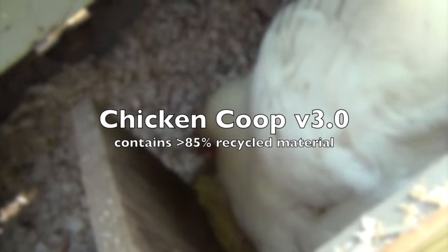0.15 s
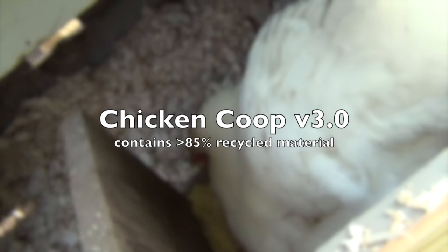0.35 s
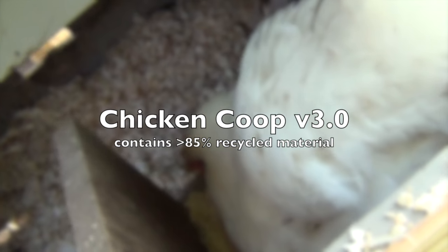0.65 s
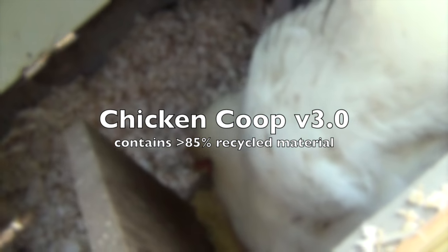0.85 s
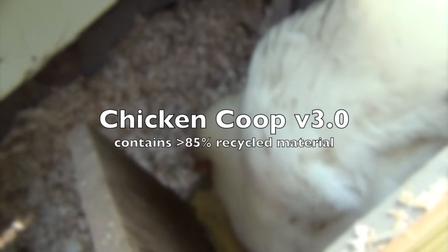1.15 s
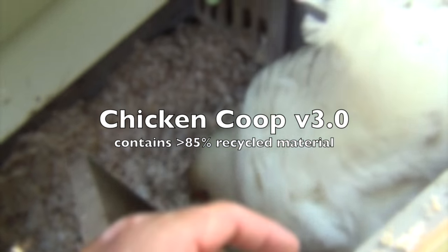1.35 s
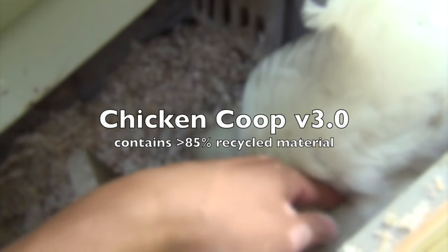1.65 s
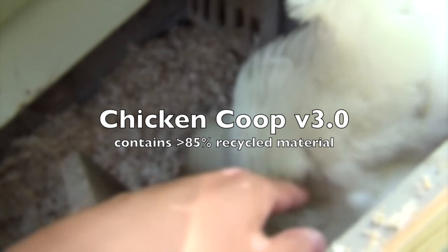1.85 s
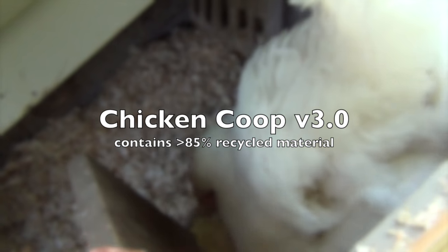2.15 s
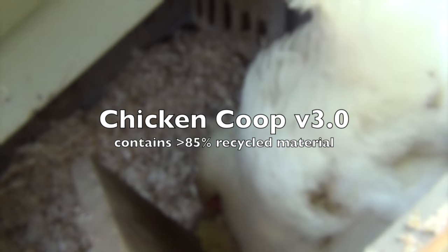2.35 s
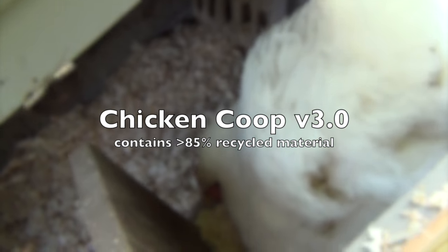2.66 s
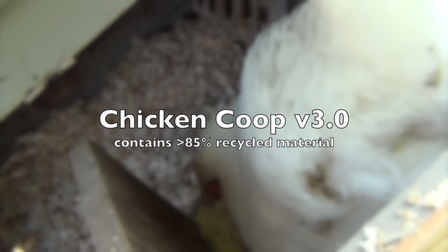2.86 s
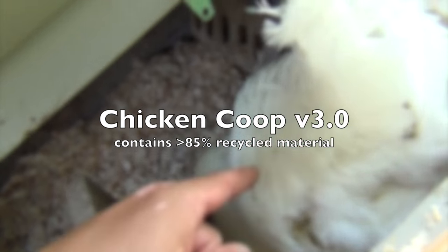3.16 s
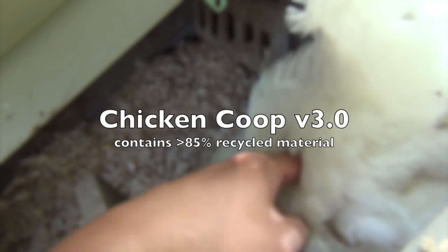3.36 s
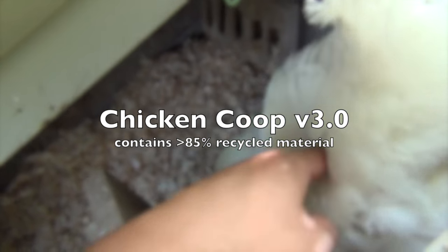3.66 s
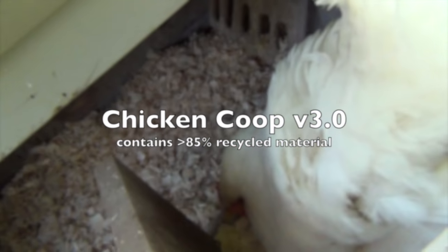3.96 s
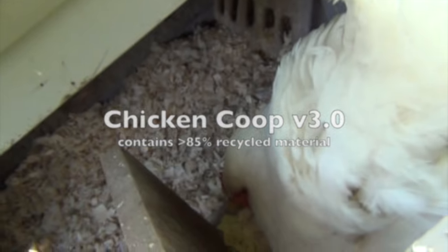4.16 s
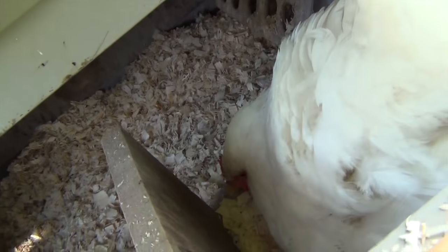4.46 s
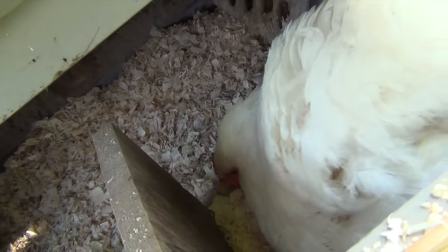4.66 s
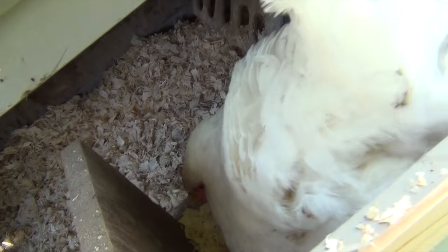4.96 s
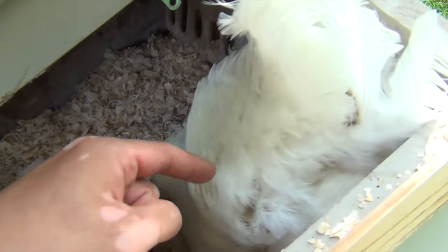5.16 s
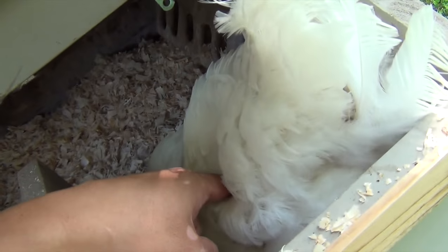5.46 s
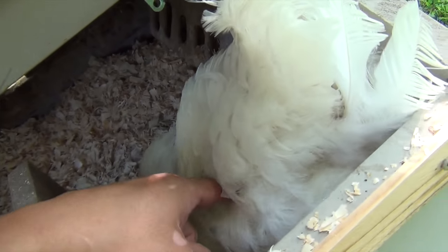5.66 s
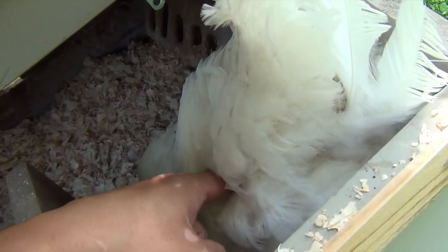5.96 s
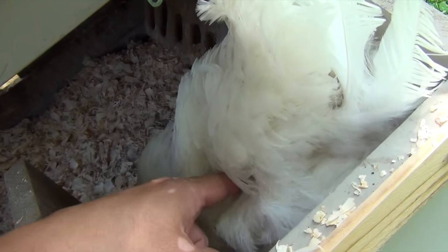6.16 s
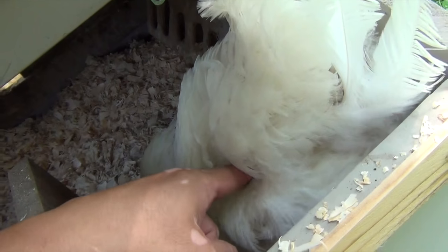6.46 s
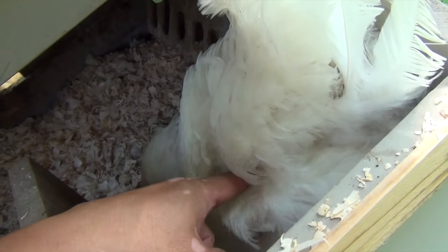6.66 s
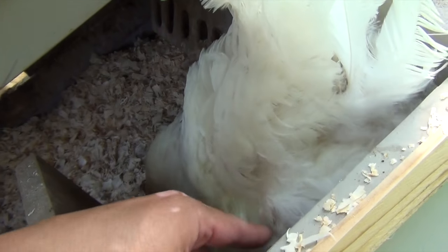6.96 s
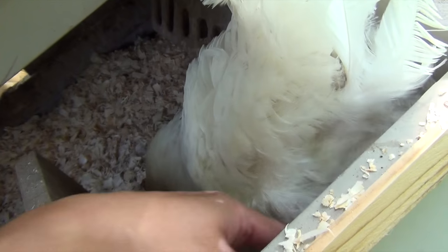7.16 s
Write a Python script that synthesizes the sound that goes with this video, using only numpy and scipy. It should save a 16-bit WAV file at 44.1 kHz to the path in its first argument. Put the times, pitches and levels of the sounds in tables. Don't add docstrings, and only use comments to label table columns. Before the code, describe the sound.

A hen clucks steadily up close in a wooden nest box, breaking into three harsh throbbing squawks amid board knocks and faint birdsong.

```python
import sys
import numpy as np
from scipy import signal
from scipy.io import wavfile
from scipy.ndimage import uniform_filter1d, minimum_filter1d

SR = 44100
rng = np.random.default_rng(int(sys.argv[2]) if len(sys.argv) > 2 else 0)


def store_pcm(level_fs):
    pcm = np.round(np.clip(level_fs, -1, 1) * 32767).astype(np.int16)
    wavfile.write(sys.argv[1], SR, np.atleast_2d(pcm).T)


def level_to_linear(level):
    exponent = np.asarray(level, float) / 20
    return 10 ** exponent


N = 321841

# [pitch_hz, density_db_per_hz]
YARD_COLOUR = [(18, -56), (42, -21.5), (62, -9), (199, 1.5), (389, -7), (620, -5), (725, -7.5),
               (1280, -6.5), (2320, -14.5), (5180, -17), (5900, -18.5), (12800, -26), (15000, -26)]
# [pitch_hz, likeness_0_to_1]
STEREO_LIKENESS = [(50, 0.86), (300, 0.63), (1000, 0.63), (3000, 0.11), (8000, 0.18), (13000, 0.2),
                   (15500, .9)]
# [pitch_hz, level_db]
WHINE_TONES = [(60, -81.5), (129, -77.5), (15674, -79.5), (15734.3, -71.5)]

# [start_s, length_s, first_hz, last_hz, level_db]
WARBLE_NOTES = [(0, .015, 1970, 1970, -47), (0.075, 0.038, 2200, 1850, -48), (2.545, 0.11, 2380, 2290, -63),
                (2.597, 0.12, 2450, 2550, -63.5), (2.77, 0.11, 2800, 2750, -65.5),
                (2.622, 0.056, 2550, 2708, -64), (2.65, 0.073, 2610, 2210, -64),
                (2.719, 0.053, 2801, 2520, -56.5), (2.748, 0.044, 2770, 2619, -59),
                (2.817, .055, 2730, 2400, -61.5), (2.953, 0.061, 3360, 3300, -61.5),
                (2.973, 0.077, 2814, 2790, -59), (3.012, 0.042, 2900, 2810, -57),
                (4.417, 0.025, 1920, 2240, -47.5), (4.472, .07, 3000, 3420, -64),
                (4.633, 0.074, 4500, 4380, -59), (4.74, 0.086, 4330, 4520, -62),
                (4.757, 0.039, 3080, 3000, -54.5), (4.825, 0.0251, 1840, 2300, -52.5),
                (4.867, 0.057, 3370, 3150, -56.5), (5.328, 0.035, 3180, 2890, -58),
                (6.418, 0.049, 1940, 1627, -55.5)]
# [start_s, length_s, first_hz, last_hz, level_db]
SEEP_NOTES = [(1.222, .044, 4190, 3690, -74.5), (1.381, 0.064, 4260, 3690, -64),
              (1.337, 0.11, 7560, 7350, -55.5), (1.399, 0.043, 5930, 5500, -62.5),
              (1.605, .032, 4170, 3656, -62.5), (1.55, .074, 6580, 6600, -76.5),
              (5.028, .086, 7694, 7530, -61), (5.077, .06, 7680, 6740, -67), (7.238, 0.02, 8000, 8100, -61),
              (7.247, 0.031, 9100, 8700, -65), (7.25, .018, 5800, 4680, -66)]
# [time_s, pitch_hz, level_db]
WHISTLE_PATH = [
    (4.97, 3700, -45),
    (5.061, 3410, -69),
    (5.2, 3550, -72),
    (5.3, 3800, -63.5),
    (5.42, 4130, -77.5),
    (5.55, 3900, -66),
    (5.65, 3840, -68),
]
# [time_s, base_hz, flick_hz, level_db]
TRILL_PATHS = [
    [(6.285, 2170, 20.6, -59), (6.312, 2250, 776.8, -44.5), (6.322, 2420, 5.1, -51.5),
     (6.335, 2260, 3, -40.5), (6.345, 2100, 4.4, -65)],
    [(6.465, 2405, 201.5, -34), (6.475, 2410, 692, -40.5), (6.507, 2516, 1046, -41),
     (6.53, 2336, 700, -37.5), (6.55, 2040, 300, -50.5), (6.568, 1947, 198, -48.5)],
]
# [flick_s, flicks_per_s]
TRILL_FLICKS = [
    (6.311, 45),
    (6.507, 54),
]

# [start_s, level_db, rise_ms, tilt_db_per_octave, ring_factor]
BOARD_BLOWS = [(0.016, -30.5, 4.6, 4.5, 0.68), (0.0242, -22.5, 2.57, 2, 0.35),
               (0.7288, -43.5, 2.2, -2, 0.37), (0.749, -38.5, 1.1, 0.5, 0.44),
               (0.7556, -25.5, 0.99, 2, 0.31), (1.9169, -21, 0.77, 4, 0.18), (1.95, -40, 1.1, 4, 0.41),
               (2.3369, -36.5, 1.1, 5, 0.45), (2.343, -26, 2.8, 3.5, 0.43), (3.337, -36.5, 6.2, 4, 1.2),
               (3.3456, -24, 12, 3, 0.45), (4.6117, -24, 0.97, 3, 0.37), (4.925, -27, 17, 3.5, 0.69)]
# [pitch_hz, density_db_per_hz]
SHARP_COLOUR = [(47, -44.5), (80, -28), (405, -0.5), (610, 4.5), (881, -12), (1300, -9), (1450, 5),
                (1610, -17.5), (2140, -8), (3830, -17), (14000, -62.5)]
# [pitch_hz, density_db_per_hz]
SLOW_RISE_COLOUR = [(47, -56.5), (80, -33.5), (413, 4.5), (993, -5), (1110, -9.5), (1440, -6.5), (2000, -21),
                    (2440, -16), (8120, -33.5), (15000, -73.5)]
# [pitch_hz, width_hz, level_db above the colour]
BOARD_PEAKS = [(1320, 26, 0), (1800, 31, -1), (2430, 42, 7), (3653, 82, 5.5)]
# [pitch_hz, t60_s]
BOARD_DECAY = [(200, 0.9), (700, 0.46), (2000, 0.42), (5000, 0.24), (10000, 0.11)]
# [start_s, level_db, pitch_hz, width_hz]
TICK_SNAPS = [(3.1333, -25.5, 5200, 2320), (3.1328, -34.5, 9500, 2310), (4.011, -42, 4600, 1195),
              (5.7, -57.5, 7200, 1976), (6.123, -45.5, 7200, 2795), (6.891, -57, 7500, 2570),
              (7.123, -53, 7400, 3000), (1.578, -49.5, 4500, 1500), (0.024, -27, 2200, 2500),
              (0.756, -6, 2700, 2200), (1.9174, -15, 3000, 2400), (4.6141, -36, 2800, 2400)]

# [pitch_hz, t60_s]
NEST_DECAY = [(150, 0.25), (700, 0.038), (1500, 0.11), (4000, .08), (9000, 0.025)]
# [pitch_hz, t60_s]
COOP_DECAY = [(200, .22), (600, 0.29), (1500, 0.33), (2500, 0.16), (6000, 0.18)]
# [throat_factor, width_hz, level_db]
WINDPIPE = [(.7, 280, 13.5), (1.01, 350, 17.5), (1.4, 320, 0)]
# [pitch_hz, width_hz, level_db]
SQUAWK_UPPER = [(1475, 540, 3), (2040, 320, 1.5)]
# [pitch_hz, width_hz, level_db]
CLUCK_UPPER_THROAT = [(1500, 370, -7.5), (2046, 330, 2)]
# [pitch_hz, width_hz, level_db beside the upper throat]
PALATE_BAND = [(2950, 700, -24)]
# [pitch_hz, width_hz, level_db beside the effort]
BEAK_AIR = [(7400, 4200, -65.5)]
# [pitch_hz, width_hz, level_db]
BEAK_RASPS = [(4150, 820, 9), (5250, 500, -7.5)]

# [start_s, first_db, second_ms, second_db, end_ms]
CLUCK_PUFFS = [(.127, -21.5, 21.5, -16.5, 34.4), (0.519, -17.5, 16.7, -16.5, 32.2),
               (.919, -17.5, 16.6, -14.5, 24.8), (1.298, -15, 13.6, -19.5, 27),
               (1.628, -17.5, 17.4, -10.5, 38.5), (2.313, -20, 17.6, -14.5, 24.765),
               (2.718, -16.5, 14, -16, 23.1), (3.132, -12.5, 16, -17.5, 28.6),
               (3.429, -12.5, 11.5, -16.5, 37), (4.103, -20, 15.3, -14, 33),
               (4.579, -14.5, 13.6, -18.5, 28.2), (5.009, -17.5, 10.3, -17, 24.4),
               (5.267, -11, 11.8, -17, 24), (5.553, -24, 33, -38, 4), (6.195, -14, 16.3, -11.5, 30.7),
               (6.567, -12.5, 14.3, -13, 23.6), (6.963, -10, 16, -10.5, 26), (7.282, -15, 1.6, -11.5, 35)]
# [first_hz, second_hz, throat_hz, chest_db, upper_db]
CLUCK_TONES = [(443, 270, 795, 8, -30.5), (471, 330, 750, 9.5, -43.5), (406.5, 250, 680, 9, -41),
               (420, 300, 730, 9.5, -54), (412, 380, 750, 2.5, -27.5), (439, 260, 830, 10.5, -33.5),
               (421, 260, 795, 11.5, -39), (407.6, 292, 773, 6.5, -35), (401, 360, 785, 3, -29),
               (444.5, 230, 817, 9.5, -26), (423, 330, 723, 10.5, -32.5), (430, 390, 756, 8.5, -28),
               (396, 320, 750, 9, -30), (200, 200, 730, 7, -34.5), (373.4, 240, 833, 8, -29.5),
               (383, 310, 840, 10.5, -29), (360, 394, 770, 9, -28), (396, 340, 790, 7, -27.5)]
CLUCK_RASP_LEVELS = [-52.5, -61, -60, -48.5, -38, -53, -63.5, -37, -37.5, -53, -48, -56.5, -35, -59, -34.5,
                     -42, -40.5, -33.5]

# [time_s, effort_db, pitch_hz]
SQUAWK_PATHS = [
    [(1.715, -29, 503.6), (1.757, -22.5, 524.8), (1.879, -15, 499.3), (1.96, -14.5, 416.7),
     (2.03, -12.5, 352.6), (2.082, -23, 279)],
    [(3.497, -29, 448.7), (3.511, -19.5, 463.9), (3.547, -23, 552.6), (3.657, -13, 519), (3.79, -12.5, 360),
     (3.838, -17, 313)],
    [(5.573, -21, 464.4), (5.589, -20.5, 464.5), (5.635, -21.5, 502), (5.745, -14, 496),
     (5.9, -13.5, 370.8), (5.945, -20, 270.3)],
]
# [time_s, level_db beside the effort, throat_hz]
SQUAWK_THROBS = [
    [(1.73, -0.3, 909), (1.7452, -0.4, 824), (1.7624, -3, 925), (1.777, 1.7, 802), (1.7928, -0.6, 861),
     (1.8119, 3.5, 850), (1.8229, -0.2, 816), (1.8421, -1.7, 817), (1.856, 5.5, 747)],
    [(3.5043, -3.5, 813), (3.5149, 2.5, 716), (3.5291, 1, 757), (3.5447, 0.3, 900), (3.5602, 1.2, 775),
     (3.5773, -0.5, 711), (3.5936, -2, 777), (3.605, 0.2, 909), (3.6265, 0.3, 797)],
    [(5.5781, -0.5, 788), (5.5932, 7.7, 723), (5.6082, 0, 907), (5.625, 2.7, 839), (5.64, 0, 834),
     (5.6553, -1, 829), (5.6719, -3, 871), (5.685, -1.5, 911), (5.7019, 2, 705), (5.721, 2.8, 859)],
]
# [depth_0_to_1, steady_s, loose_chest_db, pitch_fall_share, lean_to_sudden_end]
SQUAWK_FLUTTERS = [
    (.78, 1.85, -26, .1, .2),
    (.68, 3.62, -11, .17, .3),
    (.62, 5.7, -24, -.06, .6),
]
# [upper_db, low_rasp_db, high_rasp_db]
BEAK_START = [
    (-29, -52, -69.5),
    (-33, -76, -53),
    (-38, -75.5, -66),
]
# [upper_db, low_rasp_db, high_rasp_db]
BEAK_END = [
    (-19.5, -38.5, -67),
    (-19.5, -38, -33.5),
    (-23, -50.5, -36),
]


def evened(x):
    return x / np.sqrt(np.mean(x ** 2) + 1e-20)


def read(points, hz):
    f, value = np.transpose(points)
    return np.interp(np.log(hz + 1), np.log(f + 1), value)


def add(mix, start_s, sound):
    part = mix[..., round(start_s * SR):][..., :sound.shape[-1]]
    part += sound[..., :part.shape[-1]]


def drift(count, hz):
    noise = rng.standard_normal(count + 2000)
    return evened(signal.lfilter(*signal.butter(2, hz, fs=SR), noise)[2000:])


def edge(x, hz, kind, order):
    return signal.sosfilt(signal.butter(order, hz, kind, fs=SR, output="sos"), x)


def resonate(x, hz, width):
    turn = np.exp(2j * np.pi * np.cumsum(hz) / SR)
    r = np.exp(-np.pi * width / SR)
    return 2 * (turn * signal.lfilter([(1 - r) ** 2], [1, -2 * r, r ** 2], x / turn)).real


def cavity(modes):
    f = abs(np.fft.fftfreq(4096, 1 / SR))
    peaks = sum(level_to_linear(db) / (1 + ((f - hz) / width * 2) ** 4) for hz, width, db in modes)
    gain = np.log(peaks + 1e-5)
    return np.fft.ifft(np.exp(gain - 1j * signal.hilbert(gain).imag)).real[:2048]


def dying_noise(decay, gain=lambda hz: 1, stretch=1):
    hz = np.fft.rfftfreq(256, 1 / SR)
    t = np.arange(400) * 64 / SR
    a, b = rng.standard_normal((2, 2, 129, 400))
    fade = level_to_linear(-60 * t / (stretch * read(decay, hz))[:, None])
    z = (a + 1j * b) * fade * np.reshape(gain(hz), (-1, 1))
    return signal.istft(z, nperseg=256, noverlap=192)[1]


def yard():
    frames, hz = N // 256 + 5, np.fft.rfftfreq(1024, 1 / SR)
    a, b, c, d, patches = rng.standard_normal((frames, 513, 5)).T
    patches = uniform_filter1d(patches, size=12, axis=0)
    patches = evened(uniform_filter1d(patches, size=14, axis=1))
    same = np.clip(read(STEREO_LIKENESS, hz), -1, 1)[:, None]
    left = a + 1j * b
    right = same * left + np.sqrt(1 - same ** 2) * (c + 1j * d)
    z = np.array([left, right]) * level_to_linear(1.2 * patches)
    from_whine = abs(hz - 15520)
    skirt = level_to_linear(-24.5) * (from_whine < 260)
    z *= (level_to_linear(read(YARD_COLOUR, hz)) + skirt)[:, None]
    below_top = hz[:, None] < 14100 + 350 * patches[200]
    z *= np.where(below_top | (from_whine < 290)[:, None], 1, .03)
    wash = level_to_linear(-58) * evened(signal.istft(z, nperseg=1024, noverlap=768)[1][:, :N])
    t = np.arange(N) / SR
    for tone_hz, db in WHINE_TONES:
        wash = wash + np.sqrt(2) * level_to_linear(db + 2.9 * drift(N, 9)) * np.sin(2 * np.pi * tone_hz * t)
    return wash


def glides(rows, blur):
    notes = []
    for start_s, length_s, first_hz, last_hz, db in rows:
        u = np.linspace(0, 1, round(length_s * SR))
        bend = 2.2 if first_hz > last_hz else 1
        hz = last_hz + (first_hz - last_hz) * (1 - u) ** bend
        hz = hz + blur * last_hz * drift(len(u), 90)
        notes.append((start_s, hz, db + 4.0 * drift(len(u), 63)))
    return notes


def whistle():
    s, hz, db = np.transpose(WHISTLE_PATH)
    t = np.arange(s[0], s[-1], 1 / SR)
    return s[0], np.interp(t, s, hz), np.interp(t, s, db) + 2.7 * drift(len(t), 40)


def trill(rows, flick_s, flicks_per_s):
    s, base_hz, flick_hz, db = np.transpose(rows)
    t = np.arange(s[0], s[-1], 1 / SR)
    flick = np.cos(np.pi * (t - flick_s) * flicks_per_s) ** 4
    return s[0], np.interp(t, s, base_hz) + np.interp(t, s, flick_hz) * flick, np.interp(t, s, db)


def birds():
    out = np.zeros(N)
    notes = glides(WARBLE_NOTES, .017) + glides(SEEP_NOTES, .022) + [whistle()]
    notes += [trill(rows, *flicks) for rows, flicks in zip(TRILL_PATHS, TRILL_FLICKS)]
    for start_s, hz, db in notes:
        tone = np.sin(2 * np.pi * np.cumsum(hz) / SR)
        add(out, start_s, np.sqrt(2) * level_to_linear(db) * tone * signal.windows.tukey(len(hz), .3))
    trees = dying_noise([(100, 0.22), (9000, 0.3)])
    echoes = signal.fftconvolve(out[None], trees / np.linalg.norm(trees[0]), axes=1)[:, :N]
    return level_to_linear(-0.5) * out + level_to_linear(-4.5) * echoes


def board(hz, rise_ms):
    modes = sum(db / (1 + ((hz - f) / width * 2) ** 2) for f, width, db in BOARD_PEAKS)
    return read(SHARP_COLOUR if rise_ms < 2.5 else SLOW_RISE_COLOUR, hz) + modes


def knocks():
    out = np.zeros((2, N))
    pan_db = np.array([[0.6], [-0.6]])
    for start_s, db, rise_ms, tilt_db, ring in BOARD_BLOWS:
        def colour(hz):
            return level_to_linear(board(hz, rise_ms) + tilt_db * np.log2((hz + 50) / 1500))

        blow = dying_noise(BOARD_DECAY, colour, ring)
        blow = blow + 0.5 * blow[::-1]
        ms = np.arange(blow.shape[1]) / SR * 1000
        crack = (1 - np.exp(-ms / rise_ms)) * (1 + 2.2 * np.exp(-ms / 5.3))
        add(out, start_s, level_to_linear(db + pan_db) * crack * blow / np.std(blow[:, :600]))
    return out


def ticks():
    out = np.zeros(N)
    for start_s, db, hz, width in TICK_SNAPS:
        snap = rng.standard_normal(200) * np.exp(-np.arange(200) / 90.0)
        add(out, start_s, level_to_linear(db) * 2.4 * signal.fftconvolve(snap, cavity([(hz, width, 0)])))
    return out


def voice(effort, hz, rough, throat_hz, chest_db, upper_db, rasps_db, upper=SQUAWK_UPPER, wide=1):
    count, tail = len(hz), 900
    turns = .9 + np.cumsum(hz * (1 + .22 * rough * drift(count, 160))) / SR
    closing = np.diff(np.floor(turns), prepend=0) > 0
    uneven_db = 4.0 * rough * np.clip(rng.standard_normal(count), -2.5, 1.2)
    pulses = evened(closing * level_to_linear(uneven_db))
    puffs = evened(np.exp(-(turns % 1) / 1.7) * rng.standard_normal(count))
    drive = pulses + rough * puffs

    def grow(x):
        return np.pad(x * np.ones(count), (0, tail), "edge")

    def throat(x):
        x = np.pad(x, (0, tail))
        chest = level_to_linear(grow(chest_db)) * edge(resonate(x, grow(hz), 360), 200, "high", order=4)
        slack_db = .7 * np.minimum(grow(chest_db) - 3, 0)
        pipe = 0
        for k, (factor, width, db) in enumerate(WINDPIPE):
            ring = resonate(x, grow(throat_hz) * factor, width * wide)
            pipe = pipe + (-1) ** k * level_to_linear(db + (k == 0) * slack_db) * ring
        return edge(edge(pipe, 330, "high", order=2) - chest, 1500, "low", order=4)

    def band(level_db, x, modes):
        ring = cavity(modes)
        sound = signal.fftconvolve(x * effort * level_to_linear(level_db), ring)[:count + tail]
        return sound / np.linalg.norm(ring) / np.std(x)

    out = throat(drive * effort) / np.std(throat(drive)[:count])
    out += band(upper_db, drive, upper)
    out = edge(out, 2280, "low", order=12)
    out += band(upper_db + PALATE_BAND[0][2], pulses + 1.8 * puffs, PALATE_BAND)
    out += band(BEAK_AIR[0][2] + 10, puffs, BEAK_AIR)
    for db, mode in zip(rasps_db, BEAK_RASPS):
        patchy_db = 3.2 * drift(count, 45)
        out += band(db + patchy_db, pulses + 1.4 * puffs, [mode])
    return out


def cluck(first_db, second_ms, second_db, end_ms, first_hz, second_hz, throat_hz, chest_db, upper_db, rasp_db):
    ms = np.arange(0, end_ms / 1000, 1 / SR) * 1000
    rise = 1 - np.exp(-(ms + 0.77) / 1.5)
    first = level_to_linear(first_db) * rise * (1.43 * np.exp(-(ms / 4.7) ** 2) + 0.41 * np.exp(-ms / 16))
    swell = 1 / (1 + np.exp((second_ms - ms) / 1.5))
    hz = first_hz + (second_hz - first_hz) * swell
    hz *= 1 + .1 * (end_ms - ms) / end_ms - .12 * np.exp((ms - end_ms) / 6)
    rough = .2 + swell * np.clip((360 - second_hz) / 300, 0, 1)
    effort = first + level_to_linear(second_db) * swell
    rasps_db = [rasp_db - 8.5, rasp_db]
    return voice(effort, hz, rough, throat_hz, chest_db, upper_db, rasps_db, CLUCK_UPPER_THROAT, wide=1.38)


def squawk(rows, beak_start, beak_end, throbs, throb_depth, steady_s, chest_db, fall, lean):
    steady_throbs_per_s, steady_throat_hz = 62, 814
    s, *columns = np.transpose(rows)
    t = np.arange(s[0], s[-1], 1 / SR)
    effort_db, hz = (np.interp(t, s, c) for c in columns)
    opening = (t - s[0]) / (s[-1] - s[0])
    upper_db, *rasps_db = (db + (end_db - db) * opening for db, end_db in zip(beak_start, beak_end))
    loose = 1 / (1 + np.exp((t - steady_s) / 0.012))
    throb_s, throb_db, loose_hz = np.transpose(throbs)
    throb_s = throb_s - .0015
    effort_db += loose * np.interp(t, throb_s, throb_db)
    throat_hz = steady_throat_hz + (1.01 * np.interp(t, throb_s, loose_hz) - steady_throat_hz) * loose
    throat_hz += 30 * drift(len(t), 25)
    depth = .2 + (throb_depth - .2) * loose
    rough = .42 - .08 * loose
    throb_count = np.interp(t, throb_s, np.arange(len(throbs)))
    throb_count += (t - np.clip(t, throb_s[0], throb_s[-1])) * steady_throbs_per_s
    flap = 2 * np.pi * throb_count + (1 - loose) * 1.5 * drift(len(t), 16)
    leaning = flap + lean * (1 - np.cos(flap))
    chop = 1 - depth + 2.4 * depth * ((1 + np.cos(leaning)) / 2) ** 1.5
    bend = 1 - fall * depth * np.sin(flap)
    hz *= 1 - 0.2 * np.exp((t - t[-1]) / 0.0065)
    onset = np.minimum((t - s[0]) / 0.0066 + .1, 1)
    effort = level_to_linear(effort_db + 1.1 * drift(len(t), 60)) * chop * onset
    loose_chest_db = 8.5 + (chest_db + 9.5) * loose
    hz = hz * bend * (1 - .12 * loose)
    return voice(effort, hz, rough, throat_hz * bend, loose_chest_db, upper_db, rasps_db)


def hen():
    dry = np.zeros(N)
    for (start_s, *puffs), tone, rasp_db in zip(CLUCK_PUFFS, CLUCK_TONES, CLUCK_RASP_LEVELS):
        add(dry, start_s, cluck(*puffs, *tone, rasp_db))
    calls = zip(SQUAWK_PATHS, BEAK_START, BEAK_END, SQUAWK_THROBS, SQUAWK_FLUTTERS)
    for rows, beak_start, beak_end, throbs, flutter in calls:
        add(dry, rows[0][0], squawk(rows, beak_start, beak_end, throbs, *flutter))
    box = dying_noise(NEST_DECAY, lambda hz: ((hz + 100) / 800) ** 0.38)
    box = box + .8 * box[::-1]
    box *= level_to_linear(-9.5) / np.linalg.norm(box[0])
    coop = dying_noise(COOP_DECAY, lambda hz: np.minimum(hz / 1250, 1) ** 1.4)
    add(box, .02, level_to_linear(-21.5) * coop / np.linalg.norm(coop[0]))
    add(box, .064, np.array([level_to_linear(-37)]))
    wet = signal.fftconvolve(dry[None], box, axes=1)[:, :N]
    return (dry + wet) * level_to_linear(np.array([[.4], [-2.3]]))


def scene():
    near = edge(hen(), 160, "high", order=2)
    boards = edge(knocks(), 64, "high", order=2)
    return near + boards + ticks() + birds() + yard()


def top_cut(x):
    return signal.sosfilt(signal.butter(12, 16080, fs=SR, output="sos"), x)


def record(dry):
    limit, share = .72, .6
    peak = -minimum_filter1d(-abs(dry).max(0), size=133)
    peak = uniform_filter1d(peak, size=133)
    mix = dry * np.maximum(peak / limit, 1) ** -share
    return top_cut(mix)


dry = scene()
out = record(dry)
store_pcm(out)
```